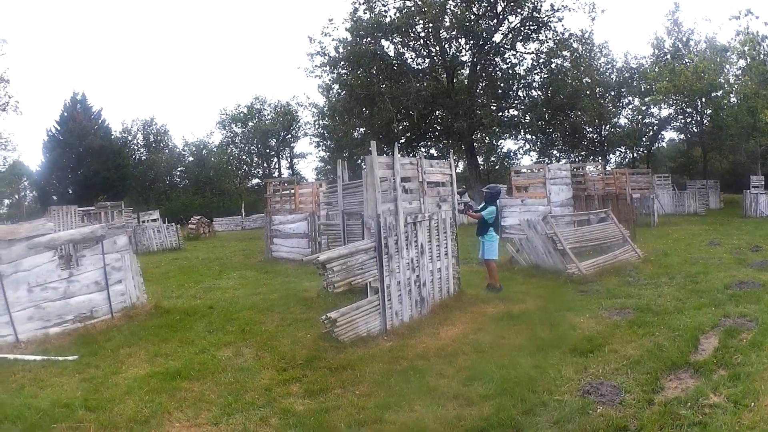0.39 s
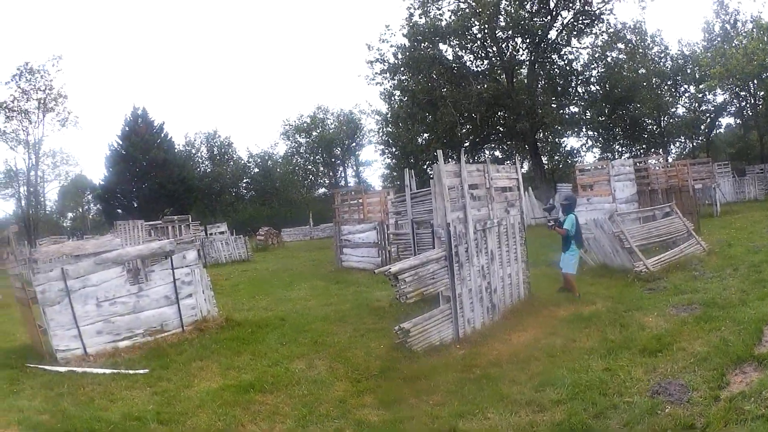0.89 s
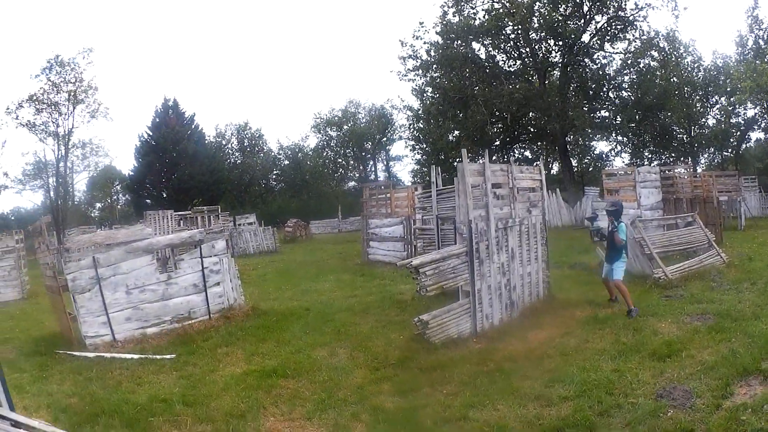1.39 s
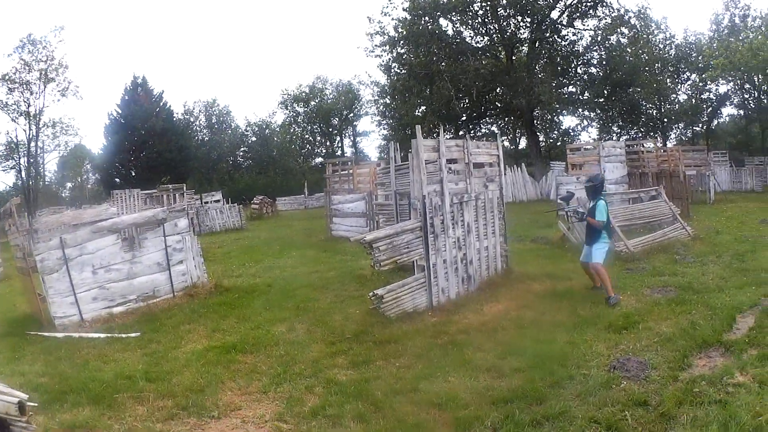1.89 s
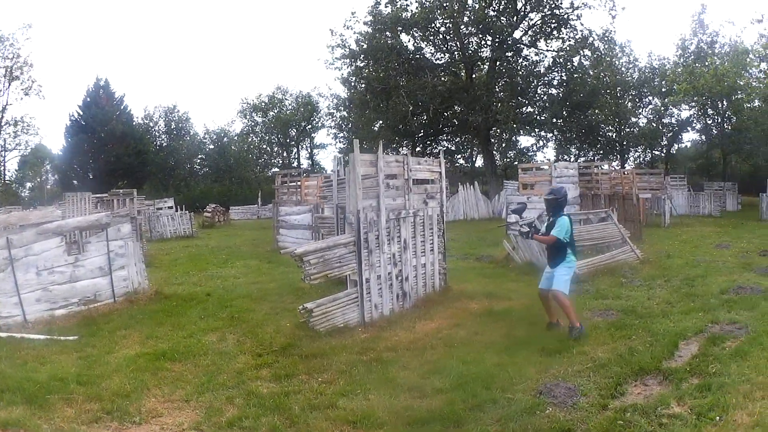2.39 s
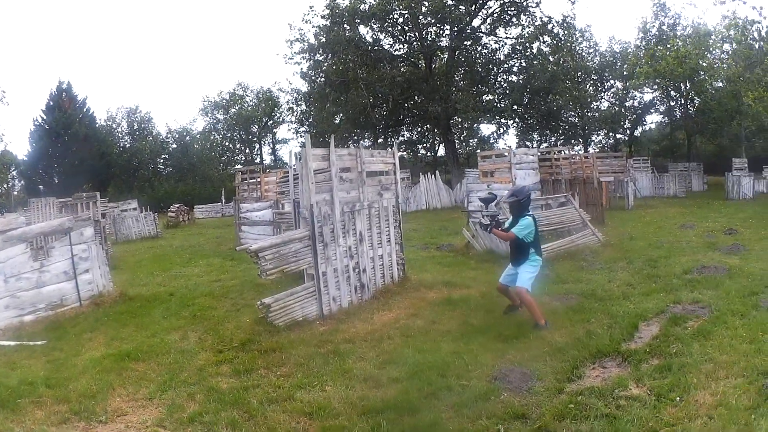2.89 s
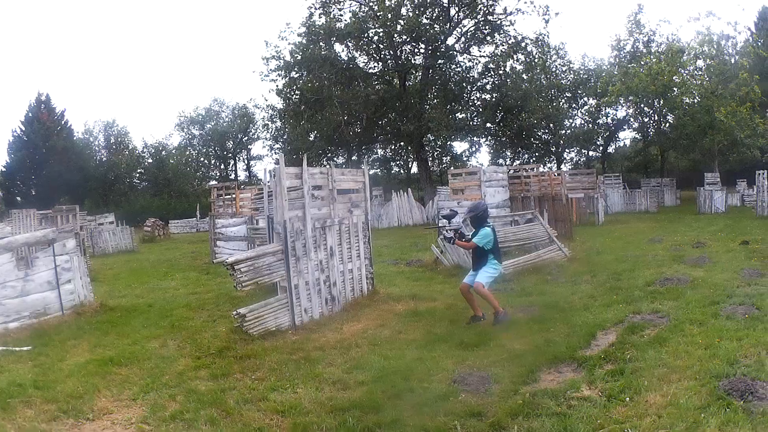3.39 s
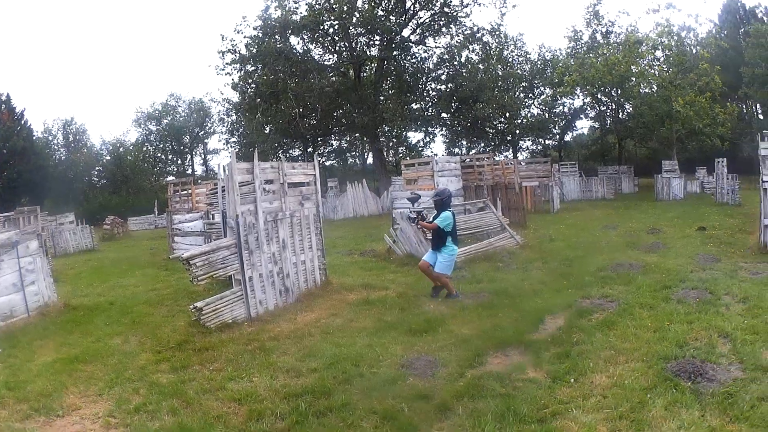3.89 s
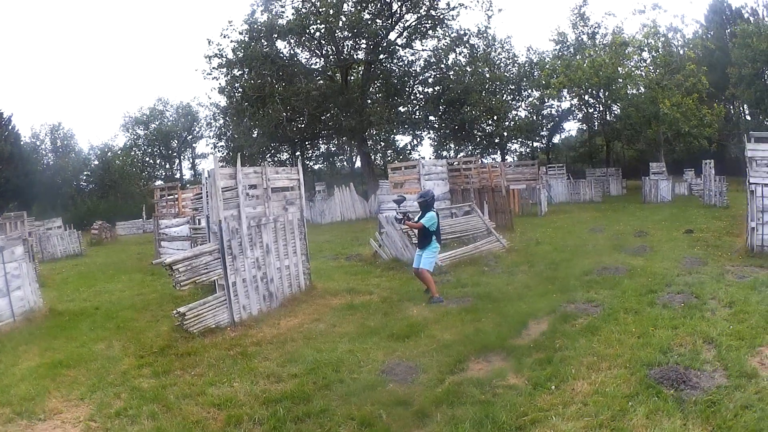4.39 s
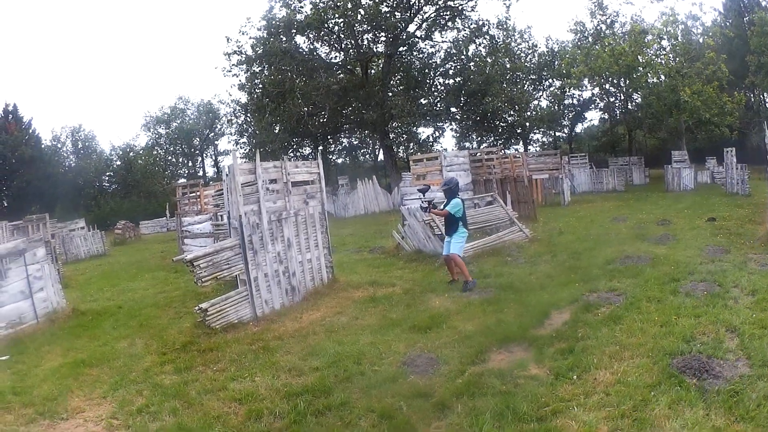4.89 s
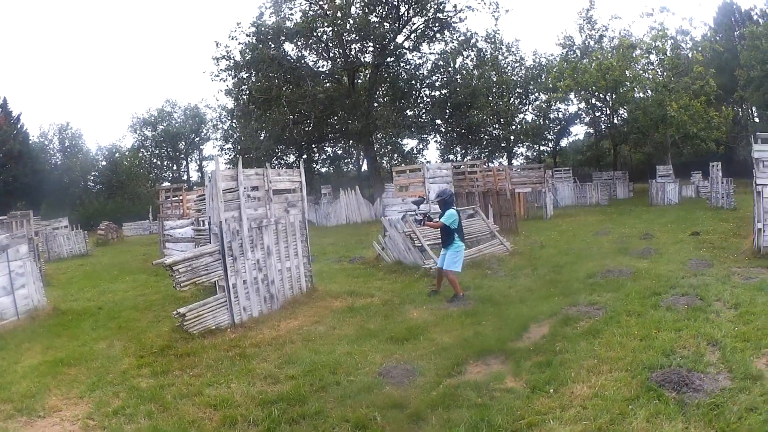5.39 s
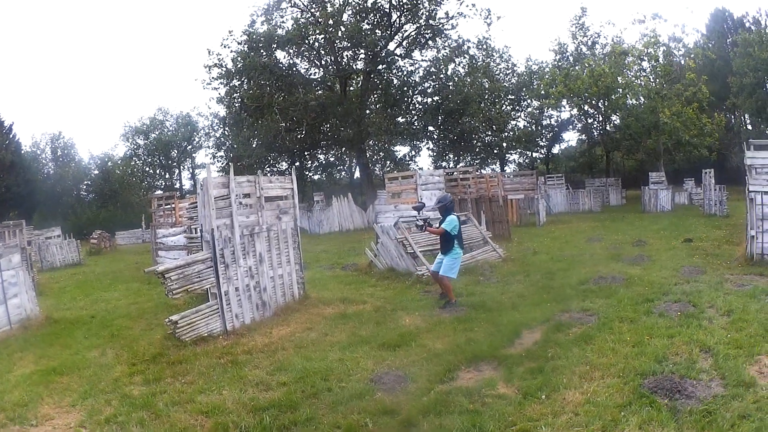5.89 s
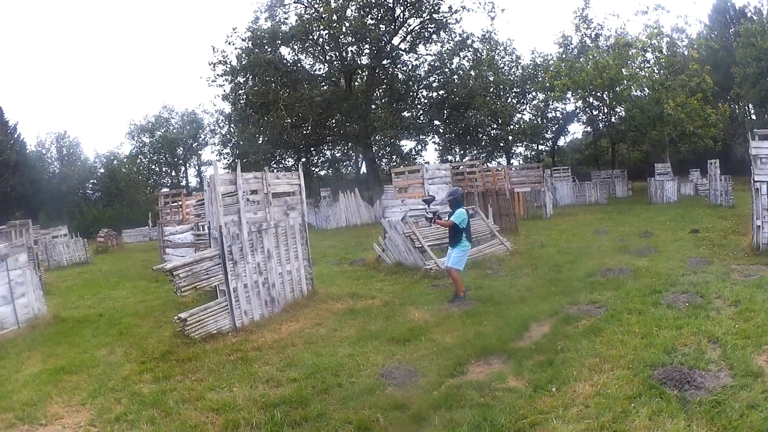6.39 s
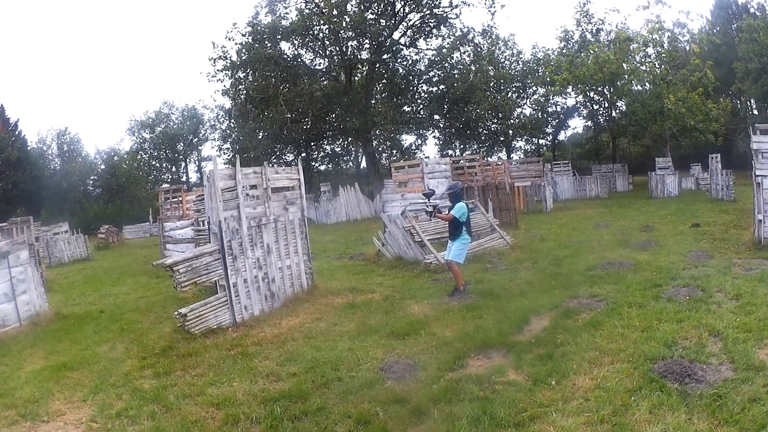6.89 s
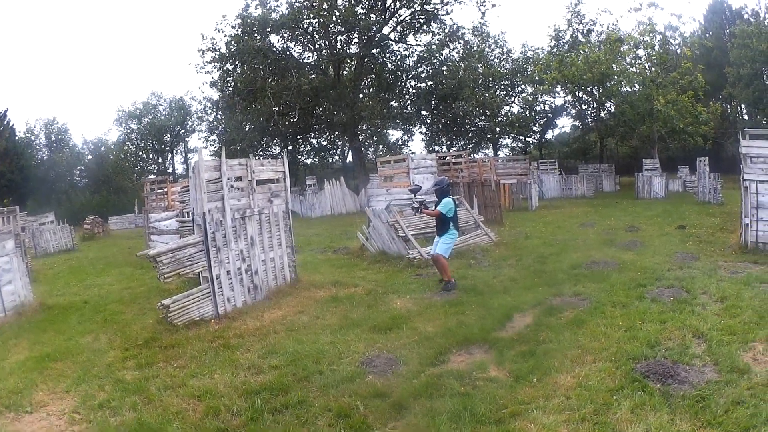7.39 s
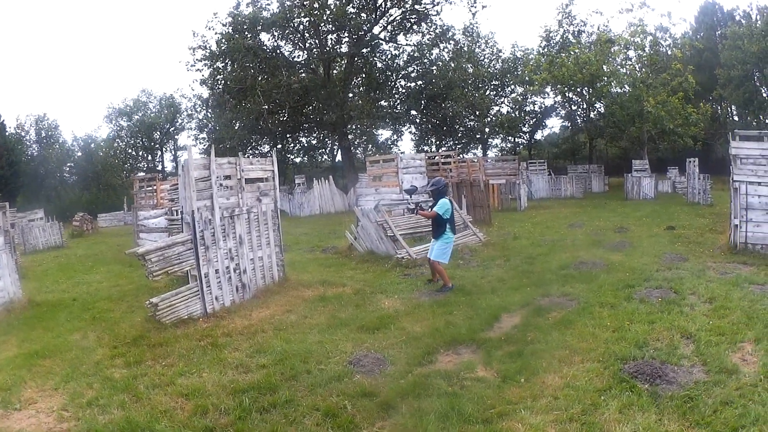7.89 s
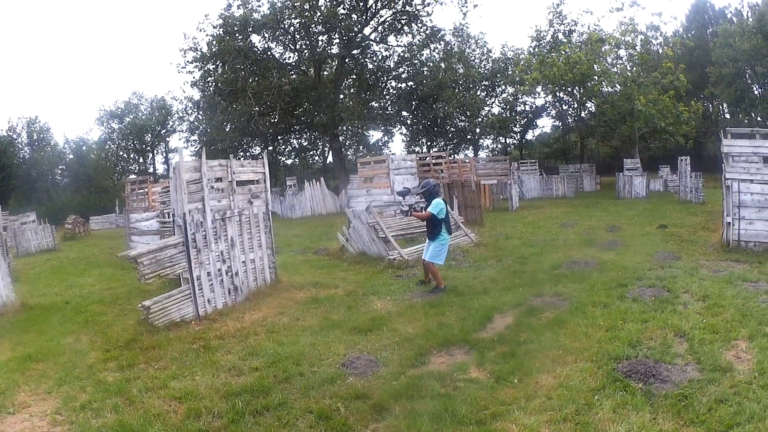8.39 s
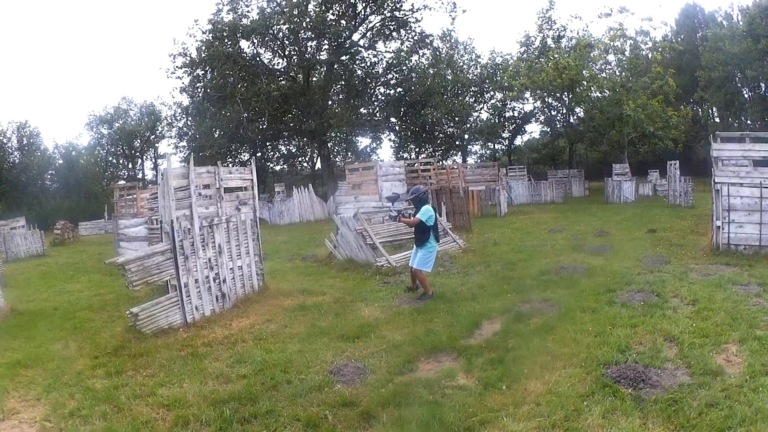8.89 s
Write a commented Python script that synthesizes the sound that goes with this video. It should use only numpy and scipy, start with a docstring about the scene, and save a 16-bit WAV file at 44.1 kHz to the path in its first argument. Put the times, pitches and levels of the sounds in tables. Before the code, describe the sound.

A close gas marker ticks, then cracks with a clipped, barrel-ringing burst. After one early shot, loose balls rattle in a hopper during steps; then several quick shots follow and irregular fire continues. A farther marker pops on the left, while balls hit boards with brief knocks, some ringing hollow or metallic. Outdoor stereo, slightly muffled by a camera housing, with patchy reflections from trees and barricades and soft air beneath.

```python
"""A near gas paintball marker ticks as its hammer falls, then bursts loudly enough to overload the microphone.
Its blast is gas noise ringing the barrel; a far marker answers from the left with a pop of dying sines.
Balls smack boards (noise through resonances) and rattle in a hopper (random clicks through its shell modes).
Barricades and trees scatter these sounds over a grass field, as shaped noise tails; a soft wash lies under all."""
import sys
import numpy as np
from scipy import signal
from scipy.fft import rfft, irfft, next_fast_len
from scipy.io import wavfile
from scipy.ndimage import uniform_filter1d

SR = 44100
rng = np.random.default_rng(int(sys.argv[2]) if len(sys.argv) > 2 else 0)


def materialize(psi):
    """Save the field psi as 16-bit PCM at rate SR to the path in sys.argv[1].

    A 1-D psi becomes a single channel; in a 2-D psi each row is a channel.
    """
    bounded = np.clip(np.atleast_2d(psi).T, -1, 1)
    quanta = np.round(bounded * 32767).astype(np.int16)
    wavfile.write(sys.argv[1], SR, quanta)


def makeup_ratio(level_db):
    """Linear amplitude ratio for a level in decibels (20 dB per factor of ten)."""
    decades = np.asarray(level_db, float) / 20
    return 10 ** decades


N = 398223


def evened(x):
    """Scales to rms 1."""
    return x / np.sqrt(np.mean(x ** 2) + 1e-20)


def peaked(x):
    """Scales to peak 1."""
    return x / abs(x).max()


def read(hz_points, values, hz):
    """Straight lines on a log-frequency axis."""
    return np.interp(np.log(hz + 1), np.log(np.asarray(hz_points) + 1), values)


def add(mix, start_s, sound):
    """Mixes a sound in at start_s."""
    part = mix[..., round(start_s * SR):][..., :sound.shape[-1]]
    part += sound[..., :part.shape[-1]]


def ring(x, peaks):
    """Bank of two-pole resonances: (frequency [Hz], width [Hz], level [dB])."""
    out = 0
    for hz, width_hz, db in peaks:
        r = np.exp(-np.pi * width_hz / SR)
        poles = [1, -2 * r * np.cos(2 * np.pi * hz / SR), r * r]
        out = out + makeup_ratio(db) * (1 - r) * signal.lfilter([1, 0, -r], poles, x)
    return out


def modes(t, table):
    """Dying sines struck at t = 0: (frequency [Hz], level [dB], t60 [s])."""
    return sum(makeup_ratio(db - 60 * t / t60_s) * np.sin(2 * np.pi * hz * t) for hz, db, t60_s in table)


def push(t, length_s):
    """The pressure jump of released gas and its suction phase."""
    return (1 - t / length_s) * np.exp(-t / length_s)


def ports(x, lead_samples, pan_db):
    """Two microphone ports: the left hears the sound lead_samples early and pan_db louder."""
    size = next_fast_len(len(x) + 64)
    delay_samples = np.array([[4 - lead_samples / 2], [4 + lead_samples / 2]])
    turn = np.exp(-2j * np.pi * np.fft.rfftfreq(size) * delay_samples)
    return irfft(rfft(x, size) * turn, size) * makeup_ratio(np.array([[pan_db / 2], [-pan_db / 2]]))


def patches(t, hz, frames, bins):
    """Random map over (frequency, time) at rms 1, smoothed over frames and bins."""
    rough = rng.standard_normal((len(t), len(hz)))
    smooth = uniform_filter1d(uniform_filter1d(rough, frames, axis=0), bins, axis=1)
    return evened(smooth).T


# left-right likeness of diffuse sound: (frequency [Hz], likeness [-1 to 1])
LIKENESS = [(60, 0.95), (240, 0.84), (950, 0.87), (3770, 0.17), (15000, -0.48)]


def diffuse(gain, samples, size):
    """Two-port noise from short-time spectra weighted by gain(hz, t)."""
    hop = size // 4
    frames, hz = samples // hop + 5, np.fft.rfftfreq(size, 1 / SR)[:, None]
    a, b, c, d = rng.standard_normal((frames, len(hz), 4)).T
    same = np.clip(read(*np.transpose(LIKENESS), hz), -1, 1)
    left = a + 1j * b
    right = same * left + np.sqrt(1 - same ** 2) * (c + 1j * d)
    z = np.array([left, right]) * gain(hz, np.arange(frames) * hop / SR)
    return signal.istft(z, nperseg=size, noverlap=size - hop)[1][:, :samples]


# scattered tail: (frequency [Hz], level [dB], t60 of the fast slope [s])
SCATTER = [(129, 14.5, 0.44), (602, 4, 0.12), (1220, 3, 0.33), (2480, -4, 0.4), (4520, -8.5, 0.42),
           (9480, -1.5, 0.47), (15940, -8.5, 0.22)]


def field(sound, walls, tail_db, build_s, slow_db=-14, slow=3.32, patchy_db=3.0, depth_ms=1.7, size=26000):
    """Patchy scattering that builds up, swells at each wall and dies in two slopes."""
    hz_points, db, t60_s = np.transpose(SCATTER)

    def gain(hz, t):
        decay_db = -60 * t / read(hz_points, t60_s, hz)
        slopes = makeup_ratio(decay_db) + makeup_ratio(slow_db + decay_db / slow)
        swells = sum(makeup_ratio(wall_db) * np.exp(-((1000 * t - ms) / depth_ms) ** 2) for ms, wall_db in walls)
        swells = 1 + swells / (1 + (hz / 4500) ** 2)  # slats return little treble
        colour = makeup_ratio(read(hz_points, db, hz) + patchy_db * patches(t, hz, 9, 3))
        return swells * colour * slopes * (1 - np.exp(-(t / build_s) ** 2))

    tail = diffuse(gain, size, 128)
    tail = makeup_ratio(tail_db) * tail / np.linalg.norm(tail[0])
    return signal.fftconvolve(sound[None], tail, axes=1)


# leaves and far traffic, relative spectrum: (frequency [Hz], density [dB per Hz])
AIR_SPECTRUM = [(20, -20.5), (45, -8.5), (85, -16), (165, -10), (550, -12.5), (900, -17), (2400, -21),
                (4400, -23.5), (6000, -32.5), (16000, -27.5)]
AIR_RMS_DB = -50.5


def air(patchy_db=0.5):
    """Soft steady wash: shaped noise with drifting patches."""
    def gain(hz, t):
        return makeup_ratio(read(*np.transpose(AIR_SPECTRUM), hz) + patchy_db * patches(t, hz, 16, 12))
    return makeup_ratio(AIR_RMS_DB) * evened(diffuse(gain, N, 1024))


# shell resonances before detuning: (frequency [Hz], width [Hz], level [dB])
HOPPER_SHELL = [(597, 34, 5), (1080, 120, 2), (1460, 114, 4), (1950, 190, 4.5), (2400, 290, 7.5),
                (2930, 180, 5)]
# the player's steps toss the balls: (time of peak [s], level [dB], fall time constant [s])
STEPS = [(1.12, -56, 0.2), (1.329, -47, 0.048), (1.62, -49.5, 0.09), (1.87, -37, 0.029), (1.972, -41, 0.11),
         (2.413, -37.5, 0.033), (2.67, -40, 0.11)]
RISE_PER_FALL = 0.86


def hopper(clicks_per_s=1100, spread_db=3.0, wet_db=-5):
    """Loose balls knock each other and the plastic shell at each step: random clicks ring its modes."""
    t = np.arange(3 * SR) / SR
    draw, sign = rng.random((len(t), 2)).T
    size = makeup_ratio(spread_db * np.minimum(rng.exponential(1, len(t)), 2.6))
    clicks = size * (draw < clicks_per_s / SR) * np.sign(sign - .5)
    # the heap detunes the shell
    shell = [(hz * k, width_hz, db) for hz, width_hz, db in HOPPER_SHELL for k in (.94, 1.06)]
    spot = rng.integers(0, len(shell), len(t))
    knocks = sum(ring(clicks * (0.16 + (spot == k)), [peak]) for k, peak in enumerate(shell))
    soft = signal.windows.hann(10)  # gelatine shells make a blunt contact
    tossing = 0
    for s, db, fall_s in STEPS:
        tossing = tossing + makeup_ratio(db) * np.exp(-abs(t - s) / np.where(t < s, RISE_PER_FALL * fall_s, fall_s))
    knocks = evened(np.convolve(knocks, soft, "same")) * tossing
    # legs brush the grass
    swish = ring(rng.standard_normal((len(t), 2)).T, [(7630, 9400, -28.5)]) * np.sqrt(tossing)
    out = np.zeros((2, N))
    add(out, 0, swish)
    add(out, 0, ports(knocks, -0.94, -0.38))
    add(out, 0, field(knocks, [], wet_db, 0.0014))
    return out


# dry clacks on boards, ground, hopper:
# (time [s], level [dB], pitch [Hz], crack level [dB], left-right [dB])
CLACKS = [(0.496, -30, 2900, -16, -4), (0.571, -37.5, 3300, -0.5, -2.5), (1.319, -31, 2160, -26, -5),
          (1.3402, -28.5, 1950, -26, -5.5), (1.7508, -29, 2400, -8, -4), (2.811, -45, 3000, 9, 3.5),
          (3.101, -34, 3600, 11.5, 0.5), (3.6625, -14.5, 636, 10, 0.5), (3.9361, -22, 1400, -1.5, 6.5),
          (4.246, -34, 990, -20.5, 2), (5.716, -28, 372, 1.5, 5.5), (5.972, -45.5, 3300, 8, -21.5),
          (7.7378, -37, 2800, 13.5, -11.5), (8.943, -24, 1080, -12, 1)]
# strikes on something hollow or metallic that rings on:
# (time [s], level [dB], pitch [Hz], crack level [dB], left-right [dB], ring level [dB], echo level [dB])
RINGING_HITS = [(0.4432, -29, 1390, 7, 9, -3, -3), (4.1802, -29, 3330, 2, -11, -6, -4),
                (5.597, -33, 3240, 8, -10, -9, -8), (6.0807, -19, 1144, 1.5, 10, -1.5, 4),
                (6.5557, -15, 3470, -6, 7, -20, 1), (7.3933, -36, 3300, 3, -9.5, -6, -6),
                (7.4869, -25, 866, 0, 7, -4, 1)]
# board resonances: (ratio to pitch [1], level [dB])
BOARD_PARTS = [(1, 7.5), (2.101, -3.5)]
KNOCK_T60_1KHZ_S, KNOCK_T60_POWER = 0.018, -.2  # power law in pitch
PING_T60_S, PING_WIDTH_HZ, CLACK_WIDTH_HZ = .09, 170, 1200  # widths: pitch in the echoes


def smacks():
    """A bursting shell cracks and what it strikes clacks briefly or rings on: noise through resonances."""
    t, out = np.arange(3500) / SR, np.zeros((2, N))
    click = signal.unit_impulse(len(t))
    for s, db, hz, crack_db, pan_db, *rings in CLACKS + RINGING_HITS:
        ring_db, echo_db = rings or (-np.inf, 0)
        t60_s = KNOCK_T60_1KHZ_S * (hz / 1000) ** KNOCK_T60_POWER
        shell, knock = rng.standard_normal((len(t), 2)).T
        parts = [(hz * k, 7 / t60_s * k, part_db) for k, part_db in BOARD_PARTS]
        wood = ring(knock * (np.exp(-t / 0.0012) + .4 * np.exp(-7 * t / t60_s)), parts)
        splash = shell * (np.exp(-t / 0.0042) + 0.18 * np.exp(-t / 0.0048))
        crack, clean = [peaked(ring(v, [(2900, 1340, -6.5), (7950, 8000, -15.5)])) for v in (splash, click)]
        hit = peaked(wood) + modes(t, [(hz, ring_db, PING_T60_S)]) + makeup_ratio(crack_db) * crack
        add(out, s, makeup_ratio(db) * ports(hit, 0.53 * pan_db, pan_db))
        width_hz = PING_WIDTH_HZ if rings else CLACK_WIDTH_HZ
        outward = peaked(ring(click, [(hz, width_hz, 0), (2800, 3000, -12)])) + makeup_ratio(crack_db + 6.0) * clean
        add(out, s, makeup_ratio(db + echo_db) * field(outward, [], 0, 0.0029, slow_db=-9.5, size=13000))
    return out


# far shots: (time [s], level [dB], gas jump and thump level [dB])
FAR_SHOTS = [(3.0013, 4, -15), (3.4823, 4, -16), (4.3998, 0, -7), (6.1786, 1.5, -10.5), (6.795, 2.5, -11.5),
             (7.5559, 1, -9), (8.1597, 2.5, -10.5), (8.7122, 1.5, -10)]
# barrel: (frequency [Hz], level [dB], t60 [s])
FAR_BARREL = [(1990, -10, 0.0094), (2335, -14.5, 0.0143), (4040, -12, 0.0091)]
# low thump: (frequency [Hz], level [dB], t60 [s])
FAR_LOWS = [(153.5, -9.5, 0.022), (433, -5.5, 0.0098), (600, -18.5, 0.051)]
# barricade rows as the far marker meets them: (delay [ms], swell over the tail [dB])
FAR_ROWS = [(16, 3.5), (23.5, 4), (28.5, 2.4), (41, 3), (54, 5.1), (80, 3.7), (96, 3.6), (143, 9.4)]


def far_marker():
    """One clean pop: gas jump, barrel ring, low thump and a puff of noise."""
    t, out = np.arange(3000) / SR, np.zeros((2, N))
    for s, db, thump_db in FAR_SHOTS:
        jump = makeup_ratio(thump_db) * push(t, 0.00059) * (1 - np.exp(-(t / .0001) ** 2))
        thump = makeup_ratio(thump_db) * modes(np.maximum(t - .0005, 0), FAR_LOWS)  # suction follows the jump
        exhaust = rng.standard_normal(len(t)) * np.exp(-t / 0.0032)
        puff = makeup_ratio(-6.0) * ring(exhaust, [(2200, 1540, 0.4), (3670, 500, -6.5)])
        pop = modes(t, FAR_BARREL) + 2.66 * jump - thump + puff
        add(out, s, makeup_ratio(db) * ports(pop, 3.57, 3.0))
        outward = ring(push(t, .00008), [(2273, 830, -3.0), (960, 120, -4.5), (7970, 46000, -6.5)])
        outward = peaked(outward) - 0.073 * thump
        add(out, s, makeup_ratio(db) * field(outward, FAR_ROWS, 0.44, 0.0005, depth_ms=0.79))
    return signal.lfilter(*signal.butter(2, 70, "high", fs=SR), out)  # the far pops carry no sub-bass


# near shots: (time [s], blast level [dB], brightness [0-1], slap delay [ms], slap level [dB])
NEAR_SHOTS = [(0.0905, 6, 0.22, 15, -8.5), (2.8489, 7.5, 0.9, 22.1, 2), (3.1644, 7, 0.94, 21, -1.5),
              (3.409, 7, 0.93, 21, -3), (3.681, 7, 0.94, 20, -1.5), (4.4121, 7.5, 0.95, 20.3, -7.5),
              (5.362, 7.5, 0.83, 19.9, -5.5), (5.804, 8.5, 1, 21.7, -9), (6.2702, 7, 0.97, 20.8, -7),
              (7.2328, 8, 0.72, 20, -10)]
# barrel and body, at full brightness: (frequency [Hz], width [Hz], level [dB])
NEAR_BARREL = [(577, 162, -3), (1009, 280, -0.5), (1400, 350, -2), (1875, 137, -1.5), (2850, 390, -2),
               (6400, 410, -12.5)]
# hammer resonances: (frequency [Hz], width [Hz], level [dB])
HAMMER_PARTS = [(2800, 1600, 10.5), (4430, 1700, 9.5), (8100, 2900, 15)]
# barricade rows as the near marker meets them: (delay [ms], swell over the tail [dB])
NEAR_ROWS = [(33, 5.5), (43, 4), (48.5, 9.5), (53, 1), (62, -1), (85, 0.5), (100, 5)]
HAMMER_LEAD_S, HAMMER_DB = .0114, -7.5
WHUMP_DB, WHUMP_DULL_DB = -5.5, 3  # grows as the barrel points away


def near_marker():
    """Hammer tick, then a gas jump and turbulent exhaust ringing the barrel, then a dull inverted slap."""
    t, out = np.arange(2400) / SR, np.zeros((2, N))
    for s, db, bright, slap_ms, slap_db in NEAR_SHOTS:
        whump_db = WHUMP_DB + WHUMP_DULL_DB * (1 - bright) ** 2
        jet, rough, left, right = rng.standard_normal((len(t), 4)).T
        gusts = jet * (np.exp(-t / 0.0064) + 0.12 * np.exp(-t / 0.0127))
        gusts = gusts + 2.0 * np.exp(-t / 0.00021)  # the valve's first kick is alike each time
        # treble beams forward
        aimed = [(hz, width_hz, peak_db - 9 * (1 - bright) * np.log2(hz / 500))
                 for hz, width_hz, peak_db in NEAR_BARREL]
        whump = np.sin(2 * np.pi * 470 * t) * np.exp(-t / 0.0024)
        whump = whump + 0.72 * np.sin(2 * np.pi * 140 * t) * np.exp(-t / 0.00092)
        blast = peaked(ring(gusts, aimed)) + 0.28 * push(t, 0.000083) + makeup_ratio(whump_db) * whump
        add(out, s, makeup_ratio(db) * ports(peaked(blast), -0.21, 0.44))

        hiss = ring(np.array([left, right]) * np.exp(-t / 0.005), [(8500, 7600, 2.8)])  # differs at the ports
        add(out, s, makeup_ratio(db) * bright * makeup_ratio(-4.0) * hiss * makeup_ratio(np.array([[-1.5], [1.5]])))

        outward = [(1130, 1370, 2.0), (3460, 2400, 6 - 3 * (2 - bright)), (8000, 7900, -8 * (2 - bright))]
        add(out, s, makeup_ratio(db) * field(peaked(ring(push(t, .00008), outward)), NEAR_ROWS, -4, 0.017))

        dip = -np.cos(2 * np.pi * 1100 * (t - .0008)) * np.exp(-((t - .0008) / 0.00048) ** 2)
        wake = rough * (1 - np.exp(-t / 0.0016)) * np.exp(-t / 0.0016)
        wake = ring(wake, [(780, 1400, 17.0), (3000, 1800, -7.0)])
        add(out, s + slap_ms / 1000, makeup_ratio(slap_db) * ports(dip + .6 * peaked(wake), .3, 0))

        sliding = np.exp(-(t / 0.0033) ** 2) + 0.28 * np.exp(-t / 0.019)  # 3 ms scrape, then the spring buzzes
        tick = ring(rng.standard_normal(len(t)) * (1 - np.exp(-t / 0.00017)) * sliding, HAMMER_PARTS)
        add(out, s - HAMMER_LEAD_S, makeup_ratio(HAMMER_DB) * ports(peaked(tick), -0.8, 0))
    return out


# camera housing and microphone: (frequency [Hz], gain [dB])
MIC_COLOUR = [(30, -16), (120, 2), (4600, 3.5), (5400, -3), (7800, -5.5), (8000, -15.5), (8200, -7),
              (12000, -15.5), (16000, -31), (22000, -35)]


def scene():
    """All sources through the causal (minimum-phase) colour of the camera housing."""
    hz = abs(np.fft.fftfreq(2048, 1 / SR))
    log_gain = np.log(makeup_ratio(read(*np.transpose(MIC_COLOUR), hz)))
    colour = np.fft.ifft(np.exp(np.conj(signal.hilbert(log_gain)))).real[:1024]
    mix = air() + hopper() + smacks() + far_marker() + near_marker()
    return signal.oaconvolve(mix, colour[None], axes=1)[:, :N]


def top_cut(x):
    """Nothing passes above the cut-off."""
    return signal.sosfilt(signal.butter(12, 16360, fs=SR, output="sos"), x)


def record(dry):
    """Hard overload of the microphone at full scale."""
    overloaded = np.clip(dry, -1, 1)
    return top_cut(overloaded)


dry = scene()
out = record(dry)
materialize(out)
```